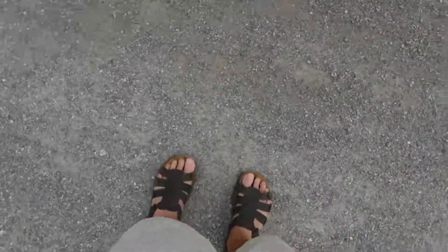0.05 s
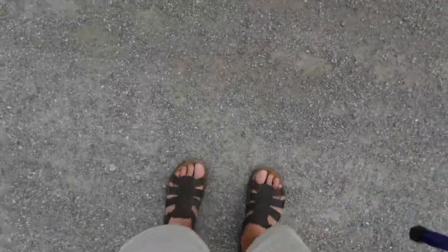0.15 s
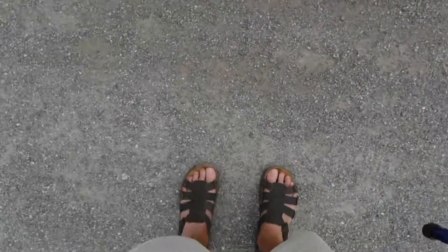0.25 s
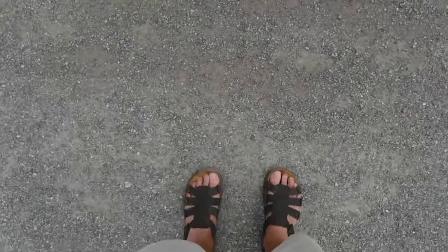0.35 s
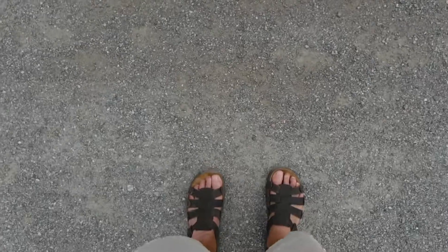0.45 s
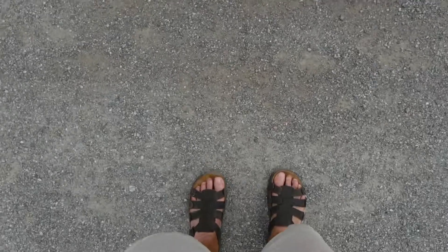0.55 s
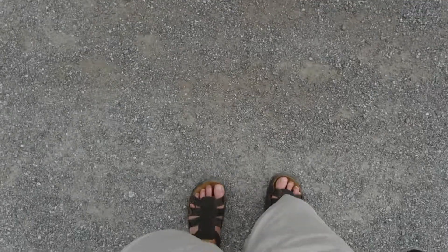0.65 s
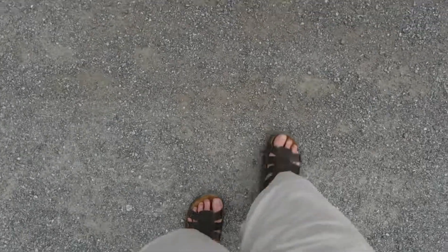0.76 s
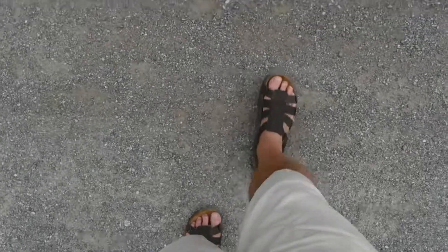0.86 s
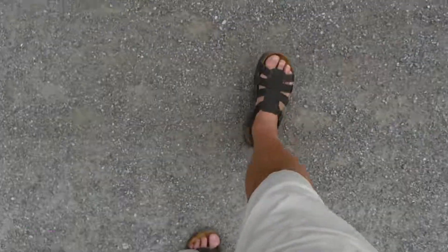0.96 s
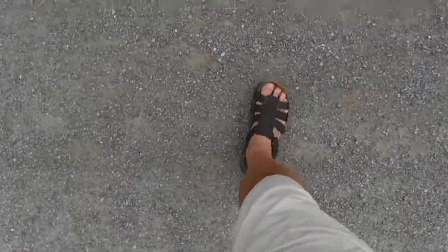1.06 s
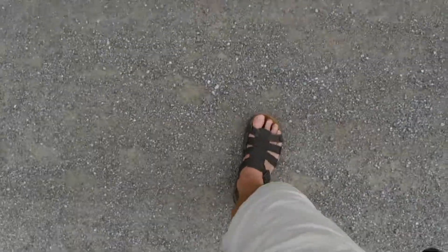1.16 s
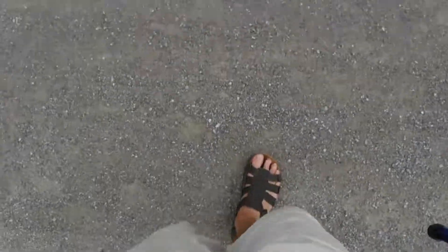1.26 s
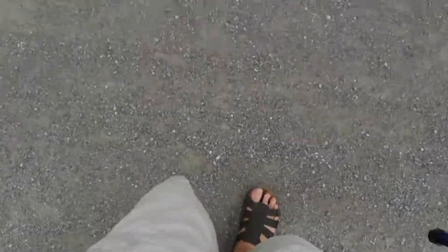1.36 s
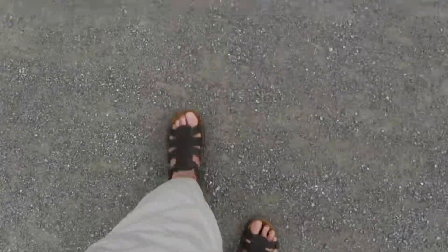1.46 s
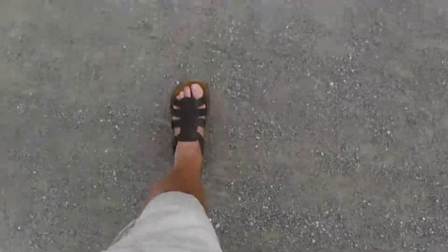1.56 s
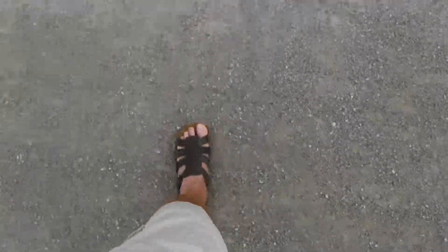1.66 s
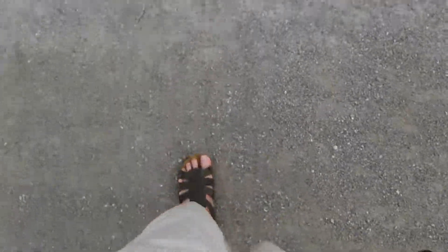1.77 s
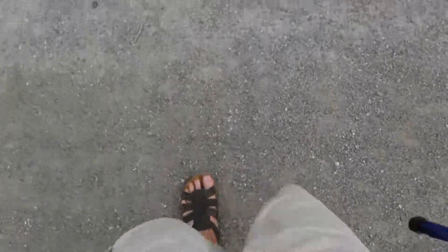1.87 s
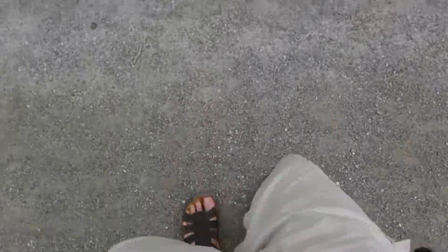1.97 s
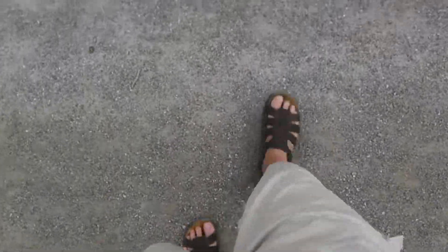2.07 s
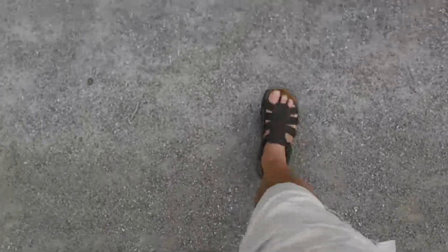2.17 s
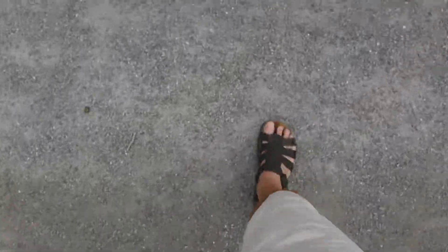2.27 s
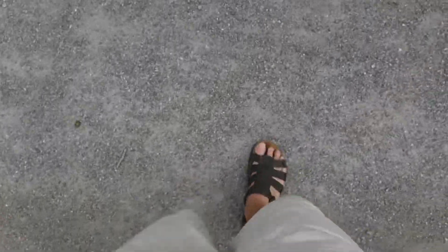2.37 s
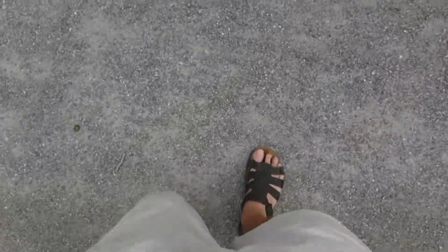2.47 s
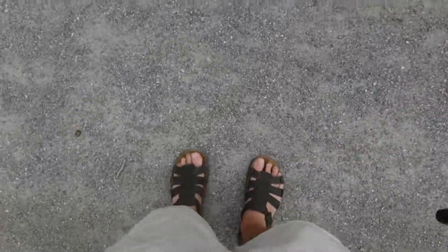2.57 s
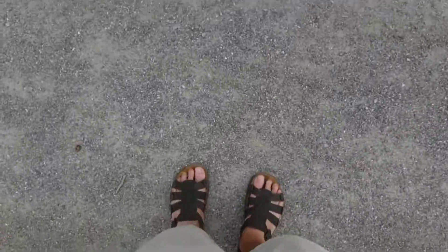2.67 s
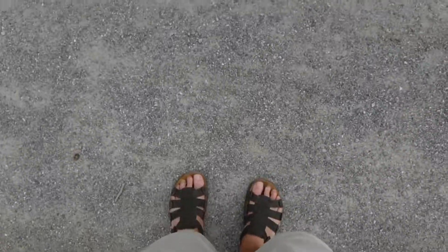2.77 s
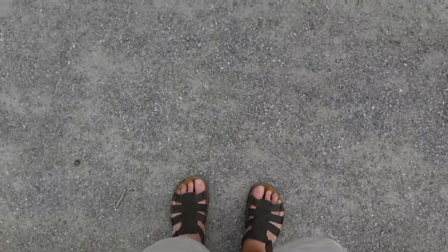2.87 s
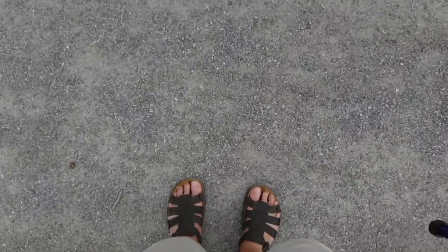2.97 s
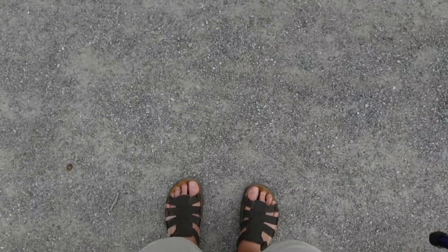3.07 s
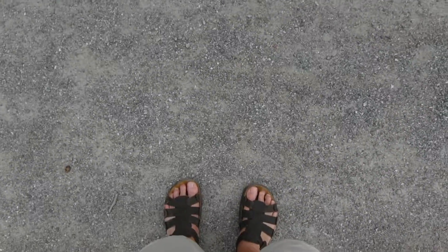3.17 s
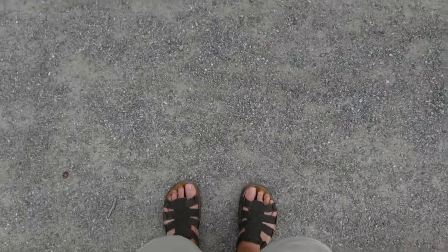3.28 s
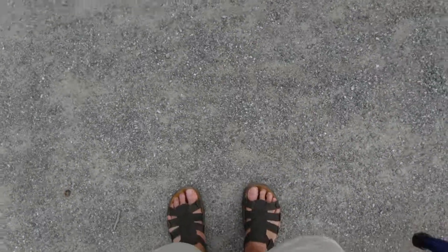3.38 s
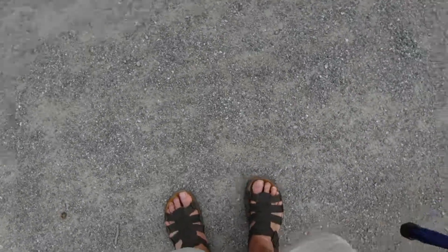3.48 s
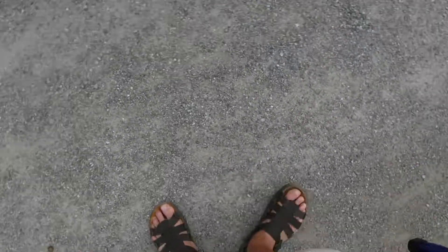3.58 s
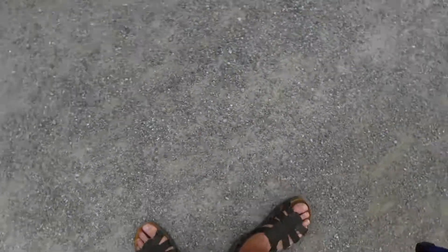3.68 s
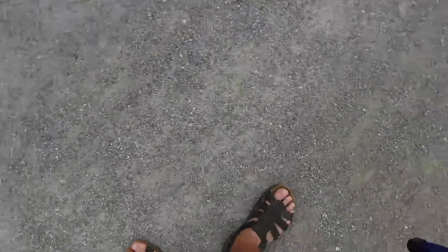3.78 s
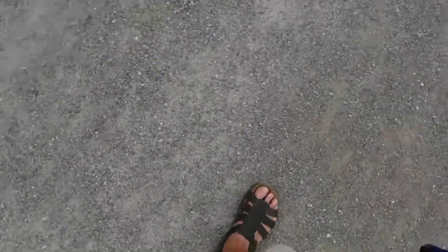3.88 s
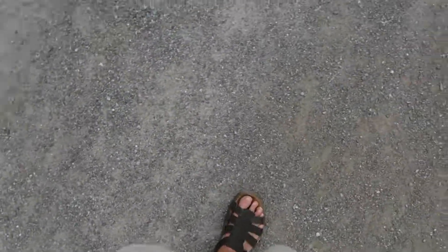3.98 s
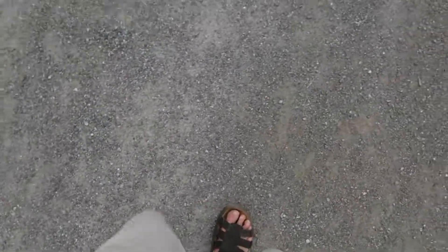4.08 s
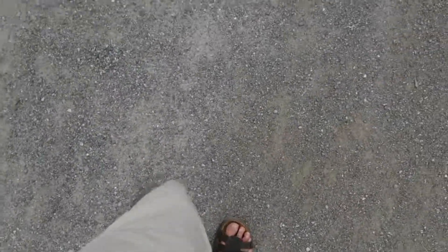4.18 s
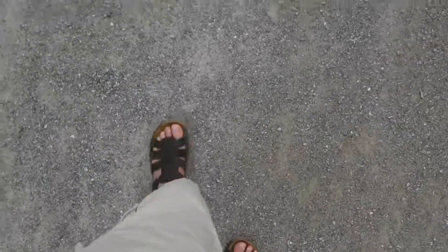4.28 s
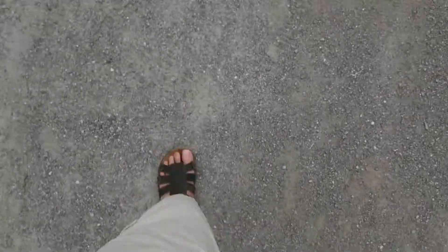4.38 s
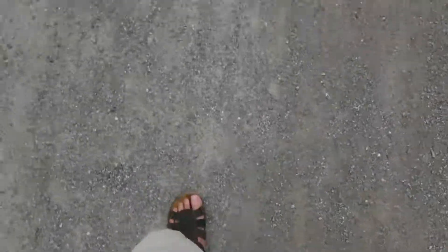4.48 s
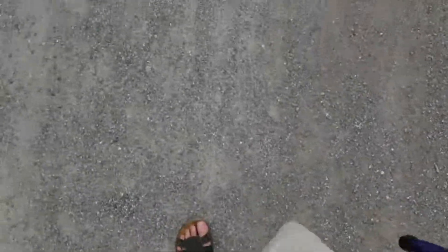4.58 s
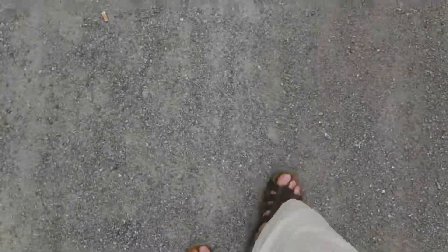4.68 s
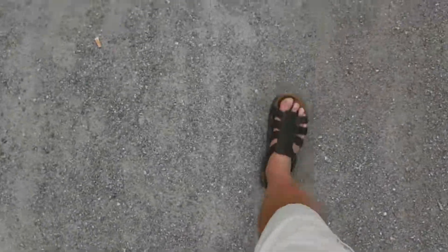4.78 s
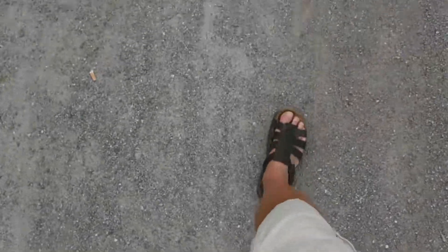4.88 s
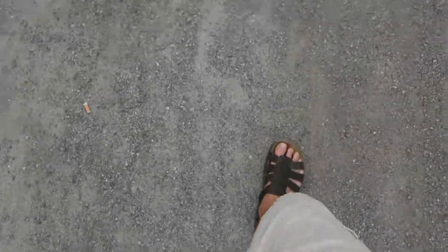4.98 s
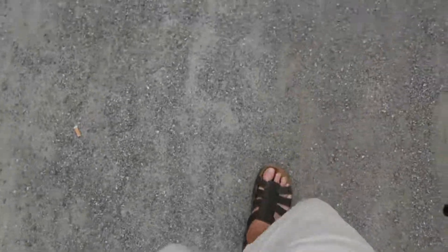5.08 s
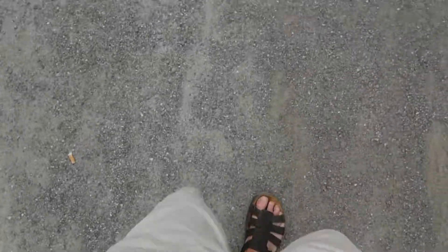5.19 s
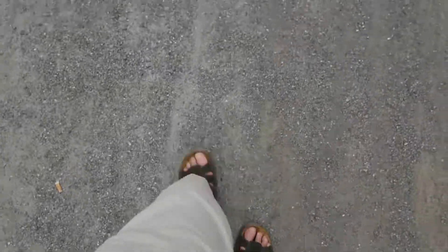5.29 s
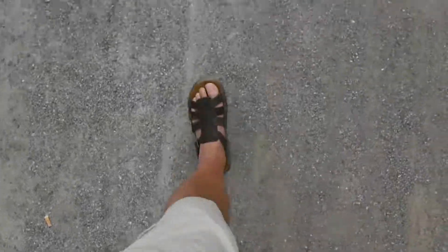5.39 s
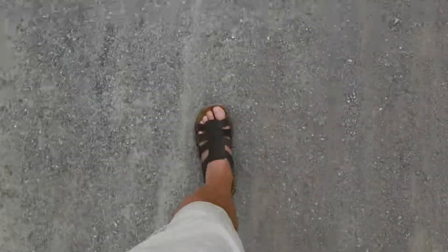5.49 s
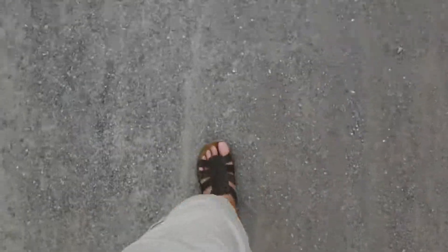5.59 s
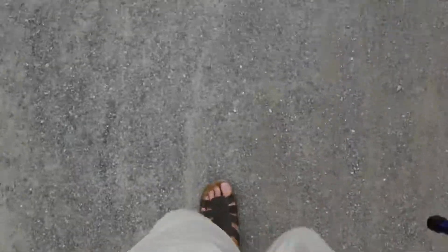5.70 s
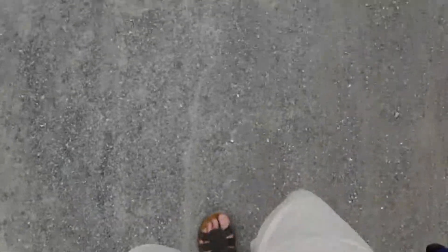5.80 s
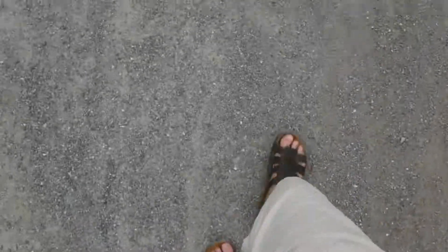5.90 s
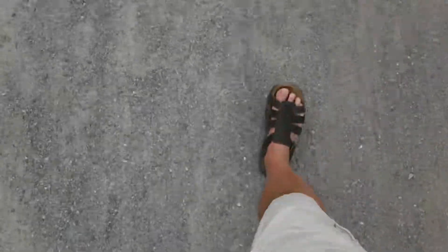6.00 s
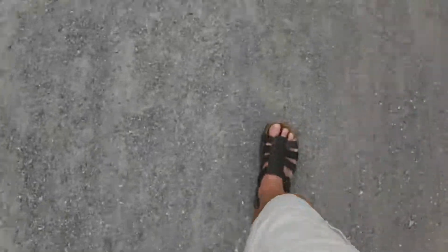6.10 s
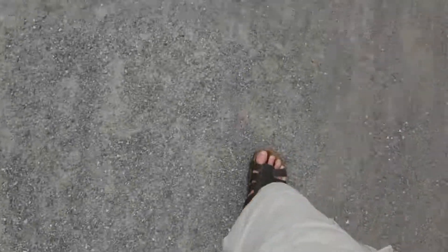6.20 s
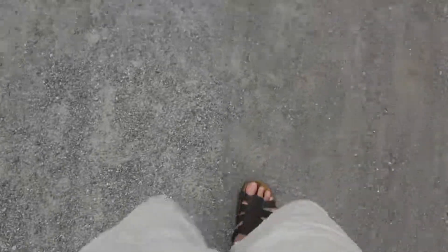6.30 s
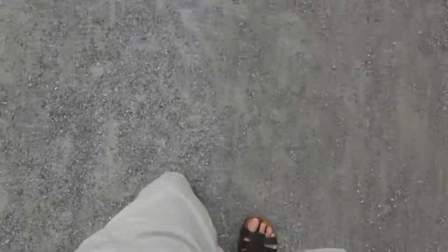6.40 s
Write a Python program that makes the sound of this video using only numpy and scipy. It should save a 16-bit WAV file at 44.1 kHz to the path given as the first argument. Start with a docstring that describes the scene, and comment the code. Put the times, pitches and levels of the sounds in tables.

```python
"""Sandals tread, pause and scuff over gritty pavement.
Sand grinds as thousands of tiny random cracks, each ringing briefly at the pitch of its grain size.
A coarser, lower-pitched layer is the rasp of the sole; single stones snap, flat blows ring the sole
and dull thuds mark footfalls. Behind lie a faint outdoor hush with drone and far hum, all filtered
noise, and two groups of soft air puffs on the microphone."""
import sys
import numpy as np
from scipy import signal
from scipy.fft import rfft, irfft
from scipy.io import wavfile
from scipy.ndimage import uniform_filter1d

SR = 44100
rng = np.random.default_rng(int(sys.argv[2]) if len(sys.argv) > 2 else 0)


def store_wav(level_fs):
    """Save 16-bit WAV to argv[1]."""
    pcm = np.round(np.clip(np.atleast_2d(level_fs), -1, 1) * 32767)
    wavfile.write(sys.argv[1], SR, pcm.T.astype(np.int16))


N = 284445
TIME = np.arange(N) / SR  # s

# Colour shared by all snapping stones. Each row: frequency [Hz], gain [dB].
SNAP_COLOUR = [(150, -30.5), (600, 2.5), (1300, 1), (1900, -0.5), (4000, -2.5), (5900, -1), (6800, -8.5),
               (9500, -14.5), (15500, -30.5)]


def undb(db):
    """Decibels to amplitude gain."""
    return np.exp(np.asarray(db) * np.log(10) / 20)


def unit(x):
    """Scale to rms 1."""
    return x / np.sqrt(np.mean(x ** 2))


def colour(x, points, size=2048):
    """Minimum-phase filter whose gain runs through (Hz, dB) points."""
    hz, db = np.transpose(points)
    bins_hz = np.maximum(np.arange(size // 2 + 1) * SR / size, 1)
    gain_db = np.interp(np.log(bins_hz), np.log(hz), db)
    # folding the cepstrum makes the response causal
    cepstrum = irfft(np.log(undb(gain_db)))
    cepstrum[1:size // 2] *= 2
    cepstrum[size // 2 + 1:] = 0
    response = irfft(np.exp(rfft(cepstrum)))
    return signal.fftconvolve(x, response)[:len(x)]


def ring(x, hz, q):
    """One resonance, gain 1 at its centre."""
    w = 2 * np.pi * min(hz, .45 * SR) / SR
    a = np.sin(w) / (2 * q)
    return signal.lfilter([a, 0, -a], [1 + a, -2 * np.cos(w), 1 - a], x + 1e-18)


def walk(rate):
    """Random levels held 1 / rate s and slewed; spread near 1."""
    hold = max(int(SR / rate), 2)
    steps = rng.standard_normal(N)[np.arange(N) // hold]
    return 1.2 * uniform_filter1d(steps, hold)


def cracks(rate, spread_db, cap):
    """Random impulses, rate a second, mostly small and a few large; mean power near 1."""
    chance = np.broadcast_to(rate / SR, N)
    at = np.flatnonzero(rng.random(N) < chance)
    size = rng.exponential(size=N)[at]
    sign = np.sign(rng.random(N)[at] - .5)
    out = np.zeros(N)
    out[at] = sign * unit(undb(spread_db * np.minimum(size, cap))) / np.sqrt(chance[at])
    return out


def grains(rate, low_hz, high_hz, q, spread_db, cap, count, tilt_db=0):
    """Grains of several sizes; each crack rings briefly at the pitch of its size."""
    pitches_hz = np.geomspace(low_hz, high_hz, count)
    octaves = np.log2(pitches_hz / np.sqrt(low_hz * high_hz))
    out = np.zeros(N)
    for hz, octave in zip(pitches_hz, octaves):
        out += ring(cracks(rate / count, spread_db, cap), hz, q) * undb(tilt_db * octave)
    return out


def press(s, attack, hold, release):
    """The load on a sole builds up to time s, is held and falls away."""
    early_s = np.maximum(s - TIME, 0)
    late_s = np.maximum(TIME - s - hold, 0)
    return np.exp(-np.minimum(early_s / attack + late_s / release, 20))


def tread():
    """All contacts add in power: load dB, rasp gain, grit fineness in dB per octave, dust gain."""
    # Loose grit stirs under the standing foot while the weight shifts.
    # Each row: start [s], end [s], load level [dB].
    shifts = [(0, 0.146, -48.5), (0.301, 2.32, -59), (3.4, 5.09, -55), (5.3, 6.35, -54.5)]
    # A sole lands on, rolls over or drags across the grit; a step is mostly a heel, then a forefoot.
    # Each row: full load at [s], load level [dB], attack [s], hold [s], release [s],
    # sole rasp relative to load [dB], grit fineness [dB per octave], dust relative to load [dB].
    contacts = [(0.039, -28.5, 0.032, 0.058, .009, -8.5, -3.3, -19),
                (.592, -50.5, .018, 0.037, .03, -19, 3, -25),
                (0.657, -40, .025, 0.015, .014, -12, -1.5, -24), (.93, -58.5, .03, 0.088, .03, -16, 4, -10),
                (1.029, -37.5, 0.0082, 0.038, .01, -13.5, 3, -13),
                (1.175, -40, 0.072, 0.015, .035, -12, 0.5, -10.5),
                (1.518, -49, .01, 0.041, 0.037, -20, 1, -22),
                (1.621, -33.5, 0.0056, 0.05, 0.048, -20, 1, -16),
                (1.734, -43, .03, 0.069, .02, -14, 3, -16), (2.052, -50.5, 0.019, .015, 0.034, -13, 3, -20),
                (2.23, -37, 0.044, .01, 0.052, -15, -0.5, -16.5),
                (2.281, -43, 0.022, 0.065, 0.022, -17, 4.2, -19),
                (2.574, -36, .002, .008, .004, -5, -7, -26), (2.587, -24, .0045, 0.0083, .009, -4, -8, -22),
                (2.611, -37.5, 0.0074, 0.009, 0.031, -10, 1, -24),
                (3.316, -45.5, 0.031, 0.051, 0.035, -18, 1.4, -8.5),
                (3.472, -28.5, 0.012, 0.057, 0.038, -7, -4.5, -39),
                (3.549, -30, .02, 0.071, .035, -9.5, -0.5, -22),
                (3.66, -25, 0.038, 0.013, 0.028, -12, 0.5, -27),
                (3.786, -46, 0.0071, 0.0053, 0.019, -20, 2, -20),
                (3.835, -41, .008, .008, 0.021, -4.5, -7, -7.5),
                (3.895, -41.5, 0.022, 0.046, 0.036, -14, -4, -7.5),
                (3.986, -37.5, 0.013, 0.013, 0.025, -16, -6.5, -5),
                (4.32, -23.5, 0.0042, 0.02, 0.014, -11.5, -5, -21),
                (4.42, -32.5, 0.059, 0.026, 0.029, -20, -0.5, -22),
                (4.484, -45.5, .015, .018, .012, -26, 6, -10),
                (4.847, -37, 0.018, 0.041, 0.042, -14.5, 1, -14),
                (4.963, -36.5, 0.017, 0.033, .024, -14.5, 1.5, -18),
                (5.239, -47.5, .014, 0.0069, .02, -24, 6.5, -22),
                (5.388, -50.5, 0.029, .03, 0.027, -16, 2, -20),
                (5.449, -40, 0.021, 0.014, 0.056, -26, -2.5, -15.5),
                (5.543, -41, 0.024, 0.013, .03, -11.5, 1.5, -20),
                (5.599, -34, 0.026, 0.014, 0.026, -12.5, -1, -19),
                (6.025, -37, 0.0066, 0.017, 0.035, -13, 0, -14.5),
                (6.118, -37, 0.017, 0.026, 0.039, -12.5, 1, -20)]
    settle_s, shift_rasp_db = 0.097, -11
    load = sum((undb(db) * press(start, settle_s, end - start, settle_s)) ** 2
               for start, end, db in shifts)
    rasp, fineness, hiss = load * undb(shift_rasp_db) ** 2, 0, 0
    for s, db, attack, hold, release, rasp_db, tilt_db, dust_db in contacts:
        power = (undb(db) * press(s, attack, hold, release)) ** 2
        load = load + power
        rasp = rasp + power * undb(rasp_db) ** 2
        fineness = fineness + power * tilt_db
        hiss = hiss + power * undb(dust_db) ** 2
    return 10 * np.log10(load), np.sqrt(rasp), fineness / load, np.sqrt(hiss)


def crunch(load_db, rasp, tilt_db):
    """More load breaks more grains a second: a bed of sand, the rasp of the sole, ticking stones."""
    # Crushed sand. Each row: frequency [Hz], gain [dB].
    sand_colour = [(150, -38), (500, 0), (1000, -33), (1800, -3.5), (3000, .5), (4500, 0.5), (6100, 2),
                   (6800, -6), (7500, -6), (8800, -13.5), (11000, -26), (15500, -27)]
    # Sole dragged over coarse grit. Each row: frequency [Hz], gain [dB].
    sole_colour = [(100, -62), (400, -14), (700, -4.5), (1100, -2.5), (1270, 2), (1450, -0.5), (1620, -1.5),
                   (2100, -8), (3200, -11), (8000, -34)]
    rate = np.clip(5000 * undb(.6 * (load_db + 40.0)), 900, 14000)
    # the sole catches and slips, so the grains come in bunches
    slip_db = 1.15 * walk(rate=170)
    fine = grains(rate, low_hz=1600, high_hz=8230, q=2.1, spread_db=2.5, cap=4.8, count=9,
                  tilt_db=tilt_db)
    coarse = grains(.4 * rate, low_hz=706, high_hz=2140, q=2.9, spread_db=3.5, cap=5.3, count=4)
    sand = unit(colour(fine, sand_colour)) * undb(load_db - 1.45)
    sole = unit(colour(coarse, sole_colour)) * rasp * undb(-0.53)
    return (sand + sole) * undb(slip_db) + ticks(load_db)


def ticks(load_db):
    """Small stones crack one by one: lone ticks under a light foot, a crackle under a heavy one."""
    rate = np.clip(100 * undb(.6 * (load_db + 48)), 12, 260)
    snaps = grains(rate, low_hz=2800, high_hz=7000, q=1.6, spread_db=3.3, cap=2.6, count=4, tilt_db=.5)
    # a foot at rest breaks no stones
    moving = np.interp(load_db, [-66, -58], [0, 1])
    return unit(colour(snaps, SNAP_COLOUR)) * moving * undb(-45.5 + .86 * (load_db + 40))


def dust(gain):
    """The finest grains hiss high up while a sole slides across them."""
    fine = grains(2000, low_hz=7500, high_hz=11500, q=2.5, spread_db=5.5, cap=4, count=3)
    dust_colour = [(3000, -40), (6000, 2.5), (7600, -2.0), (9800, -4.5), (11000, -9.0), (15500, -22)]
    return unit(colour(fine, dust_colour)) * gain


def stones(size=1024):
    """Each stone gives one sharp snap, a brief ring and a trickle of fragments."""
    # Loudest single stones that snap or are struck under a sole.
    # Each row: time of peak [s], peak before a common 2.5 dB cut [dB], pitch [Hz].
    single_stones = [(.0196, -13, 3400), (.066, -5.5, 3880), (0.0825, -7.5, 2880), (.1649, -23.5, 5600),
                     (0.2076, -24.5, 4730), (.298, -31.5, 4830), (.501, -32, 4130), (.7853, -38, 3500),
                     (1.0344, -12.5, 2850), (1.0443, -19, 2820), (1.1006, -17, 3800), (1.1377, -7, 4500),
                     (1.2208, -24, 3400), (1.4332, -27, 3100), (1.449, -28.5, 3600), (1.5258, -27, 4200),
                     (1.5673, -26, 4800), (1.6168, -11, 4730), (1.6513, -3.5, 3550), (1.6661, -11, 3600),
                     (1.7078, -18.5, 4400), (1.746, -12, 4960), (1.7776, -20, 3700), (1.8067, -24, 4200),
                     (1.8855, -26, 4100), (2.0402, -20, 3570), (2.1593, -20, 4050), (2.1952, -13.5, 4000),
                     (2.2257, -14.5, 2460), (2.5722, -21, 3000), (2.5795, -14, 2400), (2.59, -6, 2140),
                     (2.5972, -7, 1460), (2.6187, -20, 3700), (2.631, -17.5, 3300), (2.688, -27, 2340),
                     (2.8407, -29.5, 4600), (3.2986, -23, 4300), (3.332, -15, 4200), (3.4704, -8.5, 2195),
                     (3.4787, -7.5, 3480), (3.4949, -4, 1940), (3.4983, -8, 3100), (3.5038, -2, 2420),
                     (3.5097, -12, 3100), (3.5147, -8, 3000), (3.5419, -7, 2600), (3.618, -10.5, 3400),
                     (3.652, -17, 4700), (3.6615, -3.5, 4780), (3.6862, -7.5, 4300), (3.7082, -13, 2740),
                     (3.775, -4, 3230), (3.8098, -23.5, 4800), (3.822, -18.5, 1990), (3.8509, -21.5, 3600),
                     (3.9505, -22, 7200), (4.1183, -28, 4000), (4.1306, -23, 5200), (4.1724, -23.5, 6200),
                     (4.2719, -19.5, 3800), (4.311, -16, 4600), (4.3648, -13, 3000), (4.4498, -12.5, 2920),
                     (4.4616, -21, 3600), (4.6197, -28.5, 4040), (4.8821, -12.5, 3930), (4.9076, -15, 3670),
                     (4.9364, -20, 4700), (4.9486, -10.5, 3750), (4.9598, -13.5, 4800), (5.1691, -31, 3300),
                     (5.2024, -19.5, 3560), (5.219, -26, 4300), (5.2271, -11, 4250), (5.3859, -24, 4500),
                     (5.4954, -14.5, 4150), (5.604, -18, 3300), (5.7348, -23, 3080), (5.8309, -23.5, 4400),
                     (5.9196, -23, 3900), (6.0236, -23, 3900), (6.118, -16.5, 2720), (6.1398, -11.5, 3850),
                     (6.3857, -27, 4600)]
    out, age_s = np.zeros(N + size), np.arange(size) / SR
    blow = signal.unit_impulse(size)
    noises = rng.standard_normal((len(single_stones), size))
    for (s, db, hz), noise in zip(single_stones, noises):
        fragments = noise * (.11 * np.exp(-age_s / .0006) + .012 * np.exp(-age_s / .005))
        # a small stone radiates little below its own pitch
        highpass = signal.butter(3, 0.29 * hz, "high", fs=SR, output="sos")
        push = signal.sosfilt(highpass, blow + fragments)
        body = ring(ring(push, hz, q=0.89), hz, q=.6)
        chime = 0.18 * ring(push, hz * np.exp(0.23 * noise[-1]), q=5.1)  # randomly detuned
        snap = colour(body + chime, SNAP_COLOUR)
        envelope = abs(signal.hilbert(snap))
        start = max(int(s * SR) - np.argmax(envelope), 0)
        out[start:start + size] += undb(db - 2.5) * snap / envelope.max()
    return out[:N]


def slaps(size=2048):
    """A flat blow rings the sole for a few tens of cycles at most, each mode decaying by itself."""
    # Sole slaps flat on the ground. Each row: start [s], peak before the high-pass [dB].
    flat_blows = [(2.5866, -19), (2.597, -10.5), (3.493, -15), (3.505, -23), (4.329, -26)]
    # Hollow ring of the slapped sole. Each row: frequency [Hz], relative level [dB], t60 [s].
    sole_modes = [(786, -16, .018), (1110, -2, 0.026), (1330, 9, 0.038), (1425, 0, 0.053)]
    out, age_s = np.zeros(N + size), np.arange(size) / SR
    pop = sum(undb(db - 60 * age_s / t60) * np.sin(2 * np.pi * hz * age_s)
              for hz, db, t60 in sole_modes)
    for s, db in flat_blows:
        start = int(s * SR)
        out[start:start + size] += undb(db) * pop / abs(pop).max()
    return signal.sosfilt(signal.butter(2, 600, "high", fs=SR, output="sos"), out[:N])


def thuds(size=16384):
    """A soft contact gives a low, heavily damped thump: resonant noise under a fast decay."""
    # Dull thuds of footfalls and light knocks.
    # Each row: start [s], level before a common 4 dB boost [dB], pitch [Hz], decay constant [s].
    dull_knocks = [(0.054, -55, 330, .025), (1.026, -60, 232, 0.022), (1.151, -67, 480, 0.061),
                   (1.645, -56, 270, 0.018), (2.588, -56, 260, 0.018), (3.635, -55.5, 387, 0.044),
                   (4.322, -49.5, 302, 0.021), (4.42, -57, 170, 0.028), (5.101, -44, 427, 0.0047),
                   (5.153, -51, 475, 0.0066), (5.598, -48, 257, 0.014), (6.125, -64, 160, 0.022)]
    out, age_s = np.zeros(N + size), np.arange(size) / SR
    noises = rng.standard_normal((len(dull_knocks), size))
    for (s, db, hz, decay_s), noise in zip(dull_knocks, noises):
        body = unit(ring(ring(noise, hz, q=0.99), hz, q=0.99))
        envelope = (1 - np.exp(-age_s / 0.00098)) * np.exp(-age_s / decay_s)
        start = max(int(s * SR), 0)
        out[start:start + size] += body * undb(db + 4.0) * envelope
    return out[:N]


def swells(rows):
    """Gain that rises and falls smoothly around each (s, dB, length s) row."""
    return sum(undb(db) * np.exp(-.5 * np.minimum(((TIME - s) / length_s) ** 2, 10 ** 2))
               for s, db, length_s in rows)


def puffs():
    """Short eddies press on the microphone as soft low bumps."""
    # Air pushing on the microphone.
    # Each row: centre [s], peak of the rms gain [dB], length as Gaussian sigma [s].
    air_pushes = [(3.225, -43.5, 0.025), (3.3, -34.5, 0.0075), (3.375, -40.5, 0.017), (3.45, -47, .022),
                  (4.97, -44, 0.033), (5.05, -41.5, 0.019), (5.1, -41, 0.0074)]
    eddy_colour = [(12, -4), (35, 11.5), (85, 5.5), (180, -7.5), (400, -36.0), (1500, -57)]
    eddies = colour(rng.standard_normal(N), eddy_colour, size=8192)
    return unit(eddies) * swells(air_pushes)


def outdoors():
    """A nearly steady distant hush, a low wavering drone and a far hum, all filtered noise."""
    # Outdoor hush. Each row: frequency [Hz], relative density [dB per Hz].
    hush_colour = [(12, -18), (28, 1), (70, -6), (130, -9), (300, -13.5), (450, -16.5), (750, -20),
                   (1400, -20.5), (2200, -25.5), (4200, -27), (5700, -26.5), (7000, -29.5), (10000, -33),
                   (15800, -37.5)]
    # Far hum that swells and sinks. Each row: time [s], level [dB].
    far_hum = [(0, -97), (1.0, -70), (1.3, -62.5), (1.75, -56), (2.1, -62), (2.5, -68), (2.8, -62),
               (3.2, -72), (6.4, -64.5)]
    hum_colour = [(150, -10.5), (350, -9), (500, -1), (740, 4.5), (900, -8.5), (1600, -26), (5000, -50)]
    hush = unit(colour(rng.standard_normal(N), hush_colour, size=8192))
    hush = hush * undb(-52.5 + 0.18 * walk(rate=4.7))
    drone = unit(ring(rng.standard_normal(N), hz=67.2, q=9.5)) * undb(-66.5)
    hum = unit(colour(rng.standard_normal(N), hum_colour))
    hum_db = np.interp(TIME, *np.transpose(far_hum))
    return hush + drone + hum * undb(hum_db)


def scene():
    """Feet, air and surroundings at one microphone; open ground returns no echo."""
    load_db, rasp, fineness, hiss = tread()
    feet = crunch(load_db, rasp, fineness) + dust(hiss) + stones() + slaps() + thuds()
    return (feet + puffs() + outdoors())[None]


def record(dry):
    """A steep elliptic low-pass removes everything above 15.9 kHz."""
    return signal.sosfilt(signal.ellip(10, .2, 70, 15900, fs=SR, output="sos"), dry)


dry = scene()
out = record(dry)
store_wav(out)
```